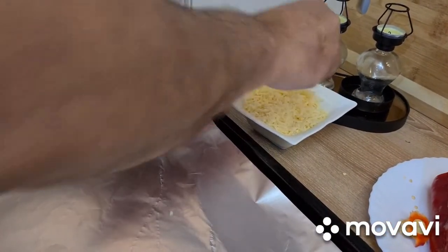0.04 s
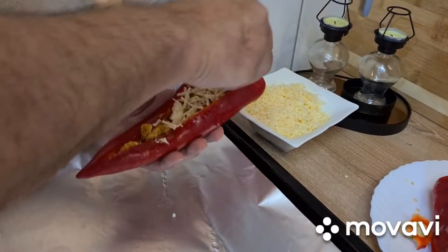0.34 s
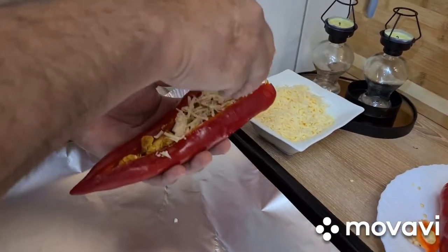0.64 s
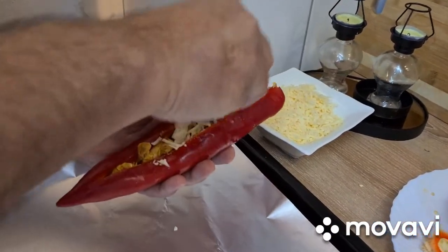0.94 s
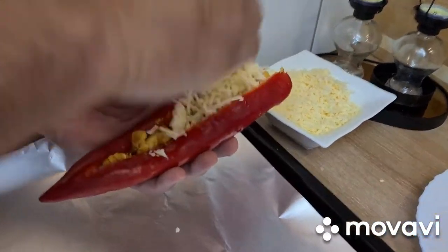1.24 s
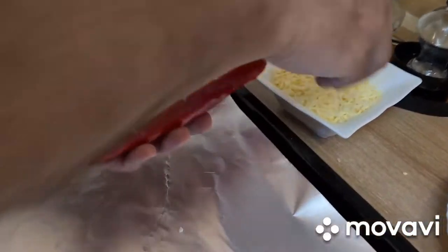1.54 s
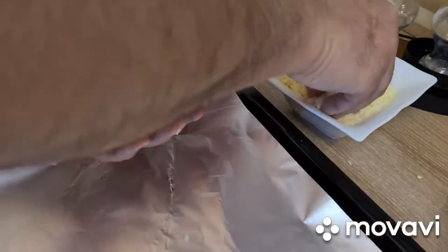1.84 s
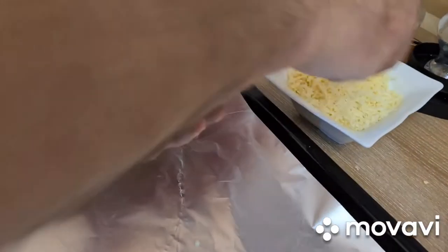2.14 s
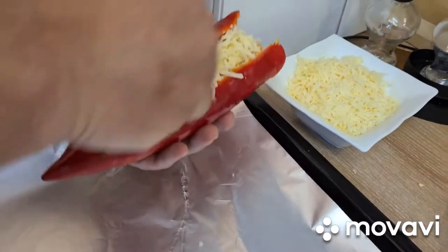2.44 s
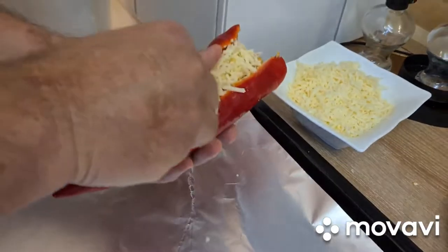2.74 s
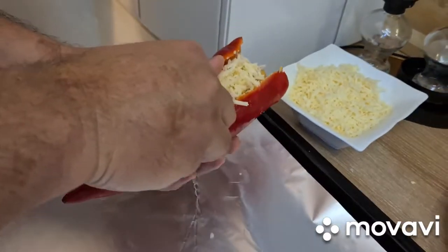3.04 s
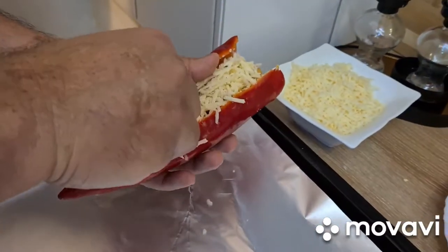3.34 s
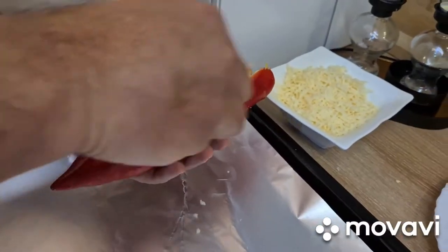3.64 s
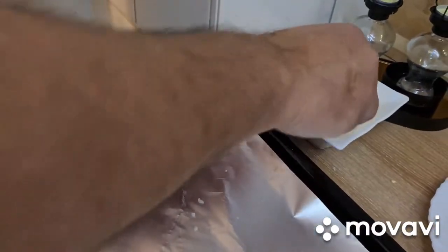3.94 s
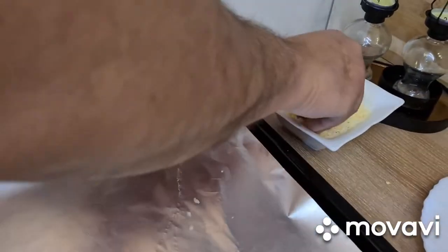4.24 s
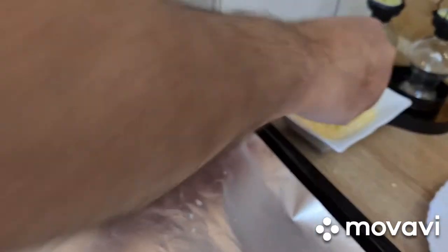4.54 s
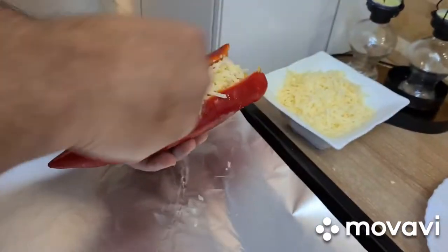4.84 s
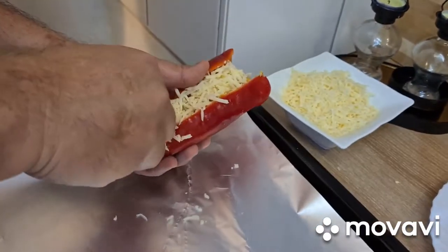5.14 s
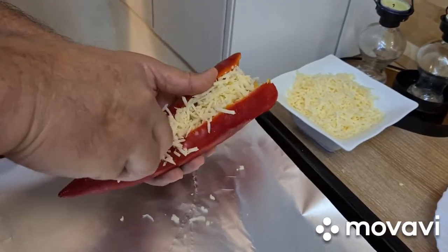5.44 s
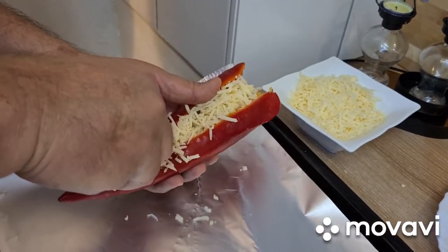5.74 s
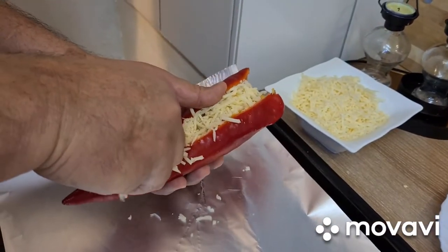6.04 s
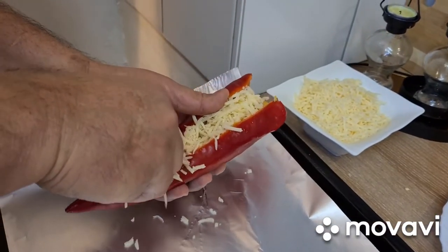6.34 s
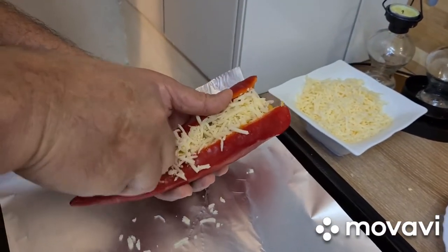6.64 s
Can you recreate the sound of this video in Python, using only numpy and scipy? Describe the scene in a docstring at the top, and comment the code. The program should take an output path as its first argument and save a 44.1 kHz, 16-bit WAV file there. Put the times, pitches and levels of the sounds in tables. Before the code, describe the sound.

Grated cheese drops in small clumps onto thin foil with light crackles, between soft knocks on a dish in a quiet kitchen.

```python
"""A quiet kitchen, where grated cheese is pressed into a pepper held over a foil-lined baking tray.
Loose shreds drop in small clumps, each a swarm of impacts that makes the thin foil crackle.
Fingers knock dully against the cheese dish and excite its low modes. There is one sharp click,
probably of the dish, and the filling gives small wet ticks as sticky surfaces part.
The reaching arm rubs faintly, and a steady hiss lies mostly to the right."""
import sys
import numpy as np
from scipy import signal
from scipy.fft import rfft, irfft
from scipy.io import wavfile

SR = 44100
rng = np.random.default_rng(int(sys.argv[2]) if len(sys.argv) > 2 else 0)


def store_wav(level_fs):
    """Save 16-bit WAV to argv[1]."""
    pcm = np.round(np.clip(np.atleast_2d(level_fs), -1, 1) * 32767)
    wavfile.write(sys.argv[1], SR, pcm.T.astype(np.int16))


N = 303628

# Clumps landing: t/s, level/dB, mean delay of the shreds/s, wrinkle resonance f/Hz, its gain/dB
CLUMPS = [(2.4099, -28.5, .0018, 4550, 6), (3.321, -33.5, 0.0035, 2940, -1),
          (3.5417, -34.5, 0.0025, 4080, -12), (4.7845, -22, 0.0017, 4360, 6), (4.8, -35.5, 0.0098, 3270, 8),
          (4.865, -27.5, .0036, 2920, 7), (4.921, -37.5, 0.009, 2990, 1), (4.958, -29.5, 0.006, 3220, 2),
          (5.006, -39.5, 0.0064, 3220, 1), (5.1713, -29, 0.0041, 4340, -2), (6.223, -35.5, 0.0079, 3200, 0),
          (6.234, -33, .011, 3140, 6.5), (6.402, -44.5, 0.016, 3160, 8), (6.424, -40, 0.01, 2970, 15.5),
          (6.459, -38.5, 0.01, 3960, 3), (6.484, -31.5, 0.0037, 3800, 16), (6.497, -35, 0.019, 3540, 9),
          (6.596, -36.5, .0069, 3880, 9), (6.609, -35, 0.0041, 2840, 8), (6.624, -40.5, 0.0094, 2930, 16)]
# The crackle as heard on each side, microphone colour included: f/Hz, left gain/dB, right gain/dB
CRACKLE_SPECTRUM = [(200.0, -46.5, -41), (724, -30.5, -31), (1490, -23.5, -20), (2790, -17.5, -13),
                    (4000, -14.5, -9.5), (5230, -12, -4.5), (6950, -9, 2.5), (8140, -4.5, -13),
                    (9340, -10.5, -3.5), (11600, -8.5, -0.5), (13750, -10.5, -7), (16400, -7.5, -19.5)]
# Narrow peaks and one notch common to every crackle: f/Hz, bandwidth/Hz, gain/dB
CRACKLE_PEAKS = [(7230, 120, 4.5), (9600, 150, 2), (11380, 230, 4), (11350, 80, -4)]


def cheese_on_foil(neutral_db=-32, tilt_per_db=0.39, tilt_above_hz=3000, wrinkle_width_hz=240):
    """Impact excitation: each shred taps the thin foil, and heavier clumps sound brighter."""
    out = np.zeros((2, N))
    for start, db, spread_s, wrinkle_hz, wrinkle_db in CLUMPS:
        db_per_octave = tilt_per_db * (db - neutral_db)

        def crackle_db(hz):
            heard = curve_db(CRACKLE_SPECTRUM, hz) + sum(resonance_db(hz, *row) for row in CRACKLE_PEAKS)
            wrinkle = resonance_db(hz, wrinkle_hz, wrinkle_width_hz, wrinkle_db)
            tilt = db_per_octave * np.log2(np.maximum(hz, tilt_above_hz))
            return heard + wrinkle + tilt

        taps = contacts(spread_s, scatter_db=4, count=120)
        shiver = reverberate(taps, near_db=2, near_t60=0.05, room_db=5, room_t60=0.16)
        add(out, burst(colour(shiver, crackle_db), db), start)
    return out


# One sharp click (second row), probably of the dish, and small wet ticks of the filling:
# t/s, level/dB, f/Hz, half-width at -12 dB/octaves, mean impulse delay/s
CLICK_AND_TICKS = [(1.775, -53.5, 10000, .85, .001), (2.0555, -34, 4180, 0.7, 0.00012),
                   (3.07, -50, 9000, 5.1, .0098), (5.2933, -51, 6900, .65, .0011),
                   (5.701, -46, 5960, 0.3, .011), (6.711, -51.5, 6040, .83, 0.0025),
                   (6.785, -54, 6000, 1.2, 0.0025)]


def click_and_ticks(left_db=-14, skirt_db=-44):
    """Band-filtered impulses: a single one makes the sharp click, short runs make the wet ticks."""
    out = np.zeros((2, N))
    for start, db, centre_hz, octaves, spread_s in CLICK_AND_TICKS:
        def tick_db(hz):
            band = -12 * np.abs(np.log2((hz + 1) / centre_hz)) / octaves
            treble_dip = resonance_db(hz, centre_hz=8300, width_hz=1500, db=-12)
            return np.maximum(band, skirt_db) + treble_dip

        impulses = contacts(spread_s, scatter_db=9, count=1 + int(spread_s * 4000))
        scattered = reverberate(impulses, near_db=-5, near_t60=0.035, room_db=-8, room_t60=0.2)
        tick = colour(scattered, tick_db) * undb([[left_db], [0]])
        add(out, burst(tick, db), start)
    return out


# Finger contacts: t/s, level/dB, contact cutoff f/Hz, tray thud relative to the knock/dB
FINGER_KNOCKS = [(1.809, -56.5, 900, -13), (2.5, -79, 400, 6), (3.075, -67, 1500, -2.5),
                 (3.219, -65.5, 600, 12.5), (4.164, -48.5, 1150, -12), (4.202, -46.5, 1160, -17),
                 (4.221, -54, 1000, 1.5), (4.433, -49.5, 750, -18), (4.453, -55, 555, -15)]
# Modes of the dish on the worktop: f/Hz, relative level/dB, T60/s
DISH_MODES = [(243, -10.5, 0.25), (294, -8, 0.19), (343, -12, 0.091), (510, -14, 0.071), (543, 0, 0.1),
              (691, 4, 0.061), (844, -21, 0.12), (1180, 1, 0.045), (1240, -5, 0.19), (1470, -2, 0.15)]


def dish_knocks(left_db=-1, detune=0.013, scuff_db=-9, tray_hz=107.5, tray_t60=0.22, tray_rise_s=0.0078):
    """Damped modal vibration: soft fingers scuff the dish and drive its low modes; the tray thuds."""
    out, t = np.zeros((2, N)), clock()
    mode_hz, mode_db, t60 = np.transpose(DISH_MODES)[:, :, None]
    thud = np.sin(2 * np.pi * tray_hz * t) * fade(t, tray_t60) * (1 - np.exp(-t / tray_rise_s))
    impulse = signal.unit_impulse(len(t))
    for start, db, cutoff_hz, thud_db in FINGER_KNOCKS:
        soft_db = lambda hz: -20 * np.log10(1 + (hz / cutoff_hz) ** 4)
        pitch = mode_hz * (1 + detune * rng.standard_normal(mode_hz.shape))
        push = undb(mode_db + soft_db(mode_hz)) * rng.choice([-1, 1], mode_hz.shape)
        ring = np.sum(push * np.sin(2 * np.pi * pitch * t) * fade(t, t60), axis=0)
        slips = contacts(spread_s=0.0097, scatter_db=1, count=40)
        scuff = colour(slips[None], lambda hz: soft_db(hz) + 20 * np.log10((hz + 10) / (hz + 300)))
        dish = unit(ring) + undb(scuff_db) * unit(scuff)
        paths = reverberate(impulse, near_db=-19, near_t60=0.063, room_db=-4, room_t60=0.31, lag_samples=7)
        heard = signal.fftconvolve(dish, paths, axes=1)[:, :len(t)]
        knock = burst(heard, db) + burst(thud, db + thud_db)
        add(out, knock * undb([[left_db], [0]]), start)
    return out


# Arm strokes (to the dish, back, pressing, to the dish, back): t/s at peak speed, level/dB
ARM_STROKES = [(1.33, -70), (2.36, -77.5), (3.15, -75), (4.11, -71.5), (4.85, -82)]


def arm_rub(centre_hz=325, half_width_hz=38, swell_s=0.2):
    """Friction noise: it follows the speed of the arm and is heard through one low, hollow resonance."""
    hz, t = np.arange(N // 2 + 1) * SR / N, np.arange(N) / SR
    friction = rfft(rng.standard_normal(N))
    rub = irfft(friction / (1 + ((hz - centre_hz) / half_width_hz) ** 2), N)
    speed = sum(undb(db) * np.exp(-np.abs(t - peak_s) / swell_s) for peak_s, db in ARM_STROKES)
    return rub / np.std(rub) * speed


# Spectral envelope of the hiss: f/Hz, left relative level/dB, right relative level/dB
HISS_SPECTRUM = [(20, -109.0, -107.0), (58.3, -101.0, -99.0), (206, -110.0, -108.0), (440, -110.0, -110.0),
                 (887, -108.0, -102.0), (1450, -98.5, -93.5), (3510, -96.5, -87.5), (7130, -100.0, -84.0),
                 (8070, -100.0, -98), (10160, -105.0, -91), (11800, -104.0, -92.0), (13300, -104.0, -99.5),
                 (15100, -109.0, -97)]


def hiss(start_db=-49, sag_db_per_s=0.2373, direct_share=0.033, bass_coherence=0.56, bass_hz=400):
    """Partial coherence: diffuse noise with a weak direct part from the right and bass partly shared."""
    hz, t = np.arange(N // 2 + 1) * SR / N, np.arange(N) / SR
    bass, source, *diffuse = rng.standard_normal((4, N))
    direct = np.array([np.roll(source, 17), source])  # reaches the left 17 samples later
    air = np.sqrt(direct_share) * direct + np.sqrt(1 - direct_share) * np.array(diffuse)
    coherence = bass_coherence / (1 + (hz / bass_hz) ** 4)
    spectrum = np.sqrt(coherence) * rfft(bass) + np.sqrt(1 - coherence) * rfft(air)
    noise = irfft(spectrum * undb(curve_db(HISS_SPECTRUM, hz)), N)
    return noise / np.std(noise) * undb(start_db - sag_db_per_s * t)


def contacts(spread_s, scatter_db, count):
    """Random impulse train: unequal impacts with gamma-distributed delays of mean spread_s."""
    out = np.zeros(len(clock()))
    delays = rng.gamma(2, spread_s / 2, count)
    at = np.minimum(delays * SR, len(out) - 1).astype(int)
    strengths = undb(scatter_db * rng.standard_normal(count)) * rng.choice([-1, 1], count)
    np.add.at(out, at, strengths)
    return out


def reverberate(taps, near_db, near_t60, room_db, room_t60, lag_samples=17):
    """Direct and diffuse fields: taps arrive on the right first, and scatter nearby and round the room."""
    t = clock()
    direct = np.array([np.roll(taps, lag_samples), taps])
    near = undb(near_db) * unit(fade(t, near_t60))
    room = undb(room_db) * unit(fade(t, room_t60) * (1 - np.exp(-t / 0.0017)))
    # taps land in different places, so their echoes add in energy
    energy = signal.fftconvolve(taps ** 2, near ** 2 + room ** 2)[:len(t)]
    return direct + np.sqrt(np.abs(energy)) * rng.standard_normal((2, len(t)))


def colour(x, db_at, size=1024):
    """Minimum-phase filter with the gain db_at(f) in dB, built by folding the cepstrum."""
    hz = np.arange(size // 2 + 1) * SR / size
    cepstrum = irfft(np.log(undb(db_at(hz))))
    cepstrum[..., 1:size // 2] *= 2
    cepstrum[..., size // 2 + 1:] = 0
    response = np.atleast_2d(irfft(np.exp(rfft(cepstrum))))
    return signal.fftconvolve(x, response, axes=1)[:, :x.shape[1]]


def resonance_db(hz, centre_hz, width_hz, db):
    """Lorentzian peak or dip, as a gain in dB."""
    return db / (1 + (2 * (hz - centre_hz) / width_hz) ** 2)


def curve_db(table, hz):
    """Left and right levels of a spectrum, interpolated in log frequency."""
    f, *sides = np.transpose(table)
    return np.array([np.interp(np.log(hz + 1), np.log(f), side) for side in sides])


def undb(db):
    """Decibels to amplitude ratio."""
    return 10 ** (np.asarray(db) / 20)


def unit(x):
    """Normalisation to a mean energy of one per channel."""
    return x / np.sqrt(np.mean(np.sum(x ** 2, axis=-1)))


def burst(x, db):
    """Equal-energy scaling: a short sound gets the energy of 20 ms at this level."""
    return unit(x) * undb(db) * np.sqrt(0.02 * SR)


def clock():
    """Half-second time axis of one short sound."""
    return np.arange(SR // 2) / SR


def fade(t, t60):
    """Exponential decay by 60 dB in t60 seconds."""
    return np.exp(-np.log(1000) * t / t60)


def add(out, x, start_s):
    """Superpose a sound from start_s on."""
    i = int(start_s * SR)
    out[:, i:i + x.shape[1]] += x[:, :N - i]


def scene():
    """Linear superposition of cheese, hands and background."""
    return cheese_on_foil() + click_and_ticks() + dish_knocks() + arm_rub() + hiss()


def record(dry, cutoff_hz=15700):
    """Band limiting: an elliptic low-pass cuts the highest treble steeply."""
    return signal.sosfilt(signal.ellip(10, 0.2, 70, cutoff_hz, fs=SR, output="sos"), dry)


dry = scene()
out = record(dry)
store_wav(out)
```